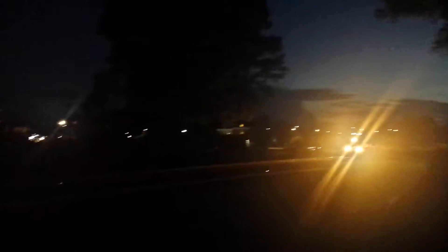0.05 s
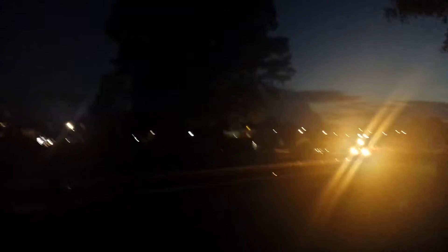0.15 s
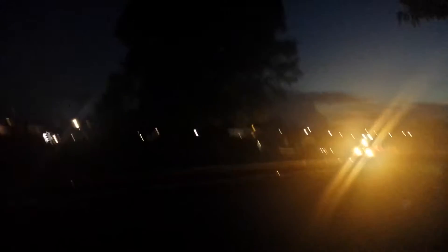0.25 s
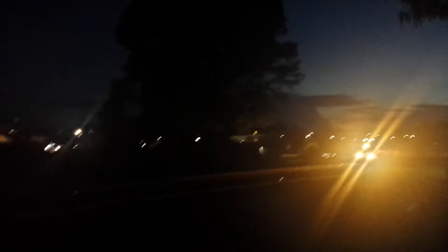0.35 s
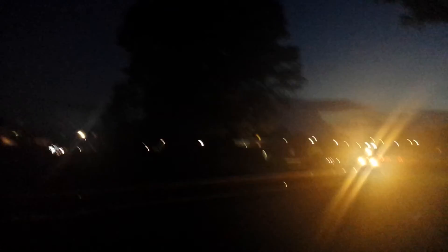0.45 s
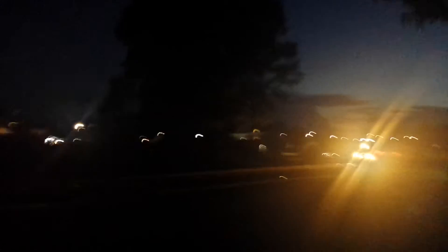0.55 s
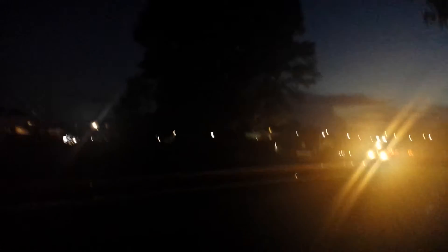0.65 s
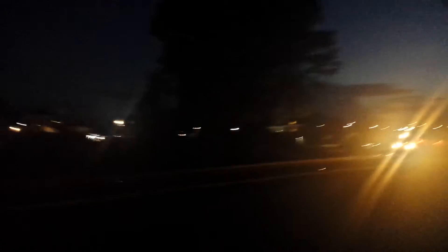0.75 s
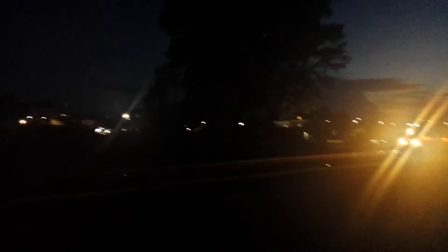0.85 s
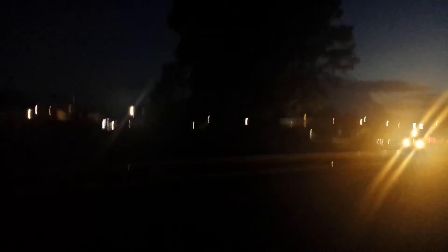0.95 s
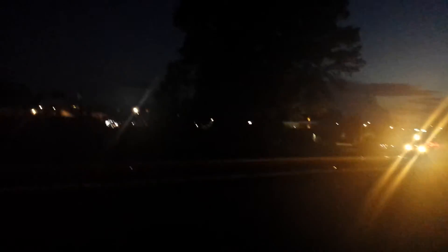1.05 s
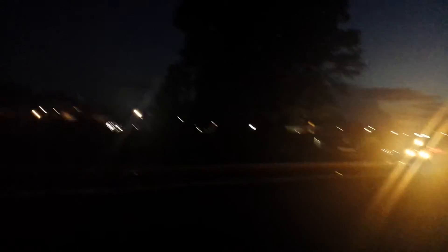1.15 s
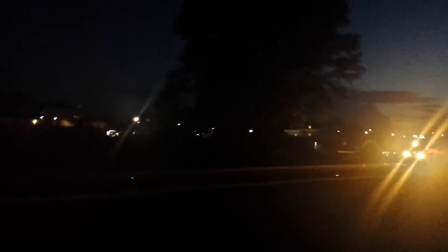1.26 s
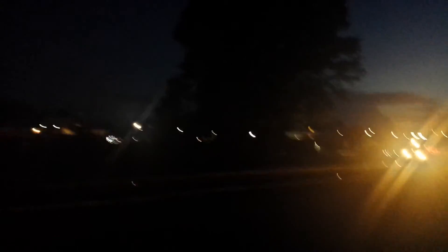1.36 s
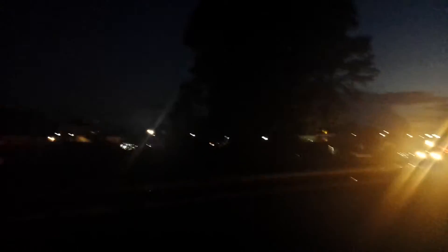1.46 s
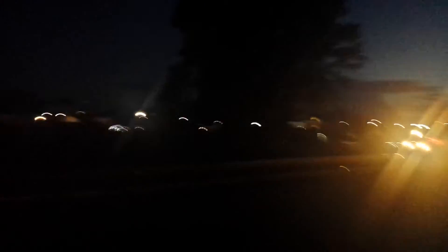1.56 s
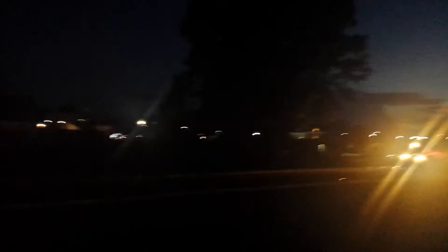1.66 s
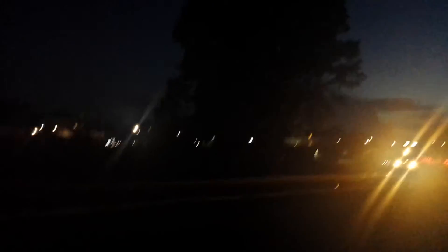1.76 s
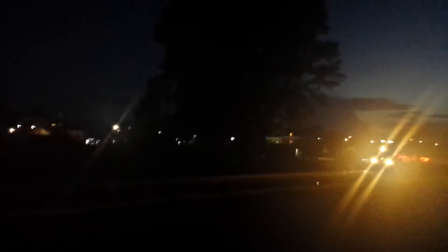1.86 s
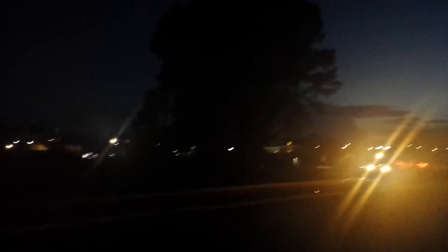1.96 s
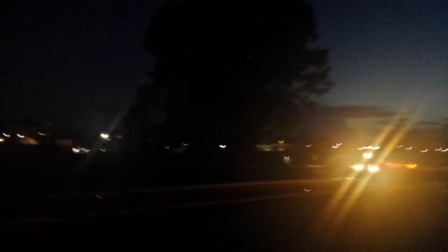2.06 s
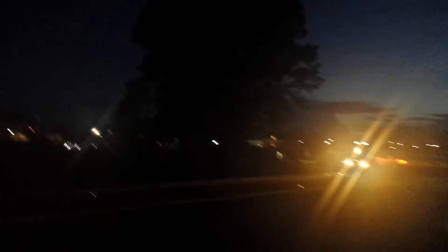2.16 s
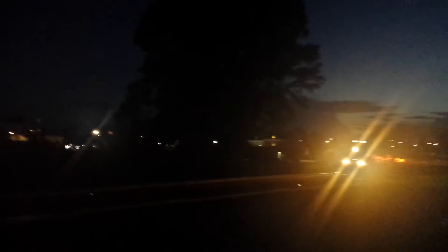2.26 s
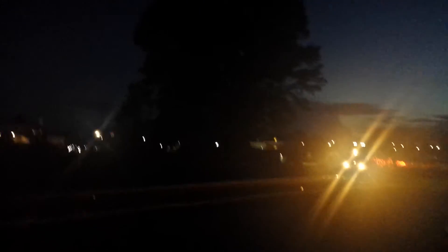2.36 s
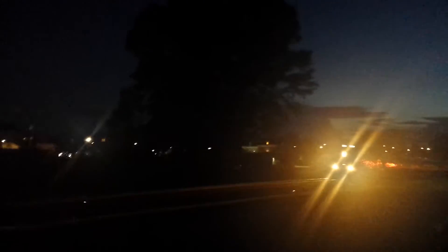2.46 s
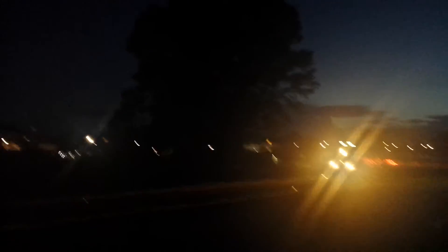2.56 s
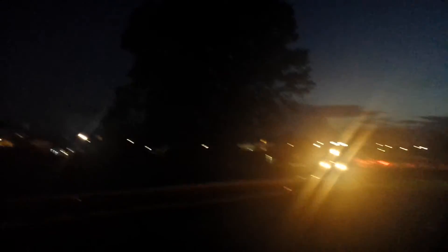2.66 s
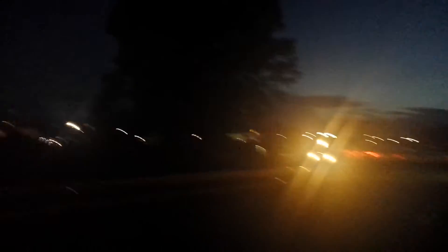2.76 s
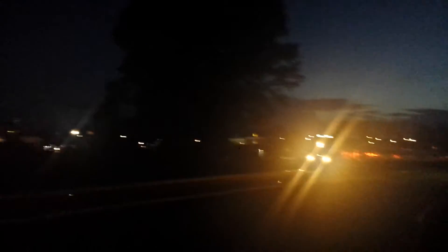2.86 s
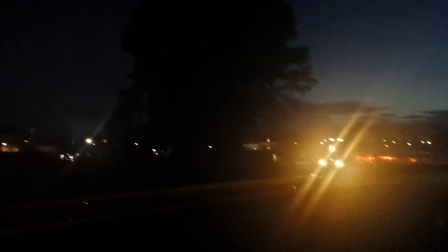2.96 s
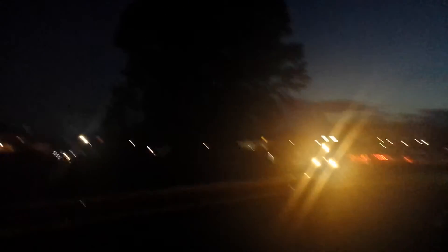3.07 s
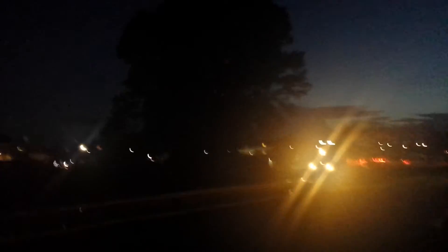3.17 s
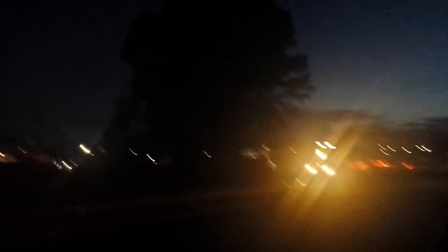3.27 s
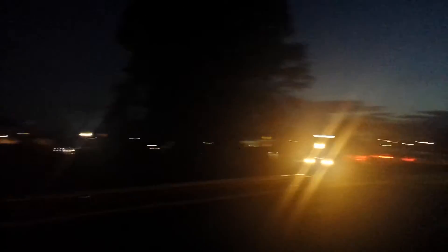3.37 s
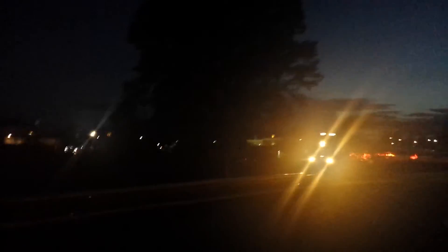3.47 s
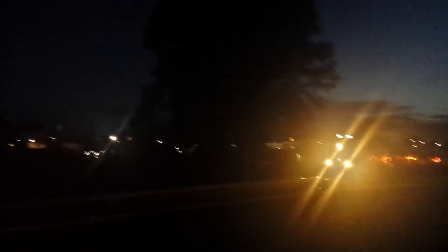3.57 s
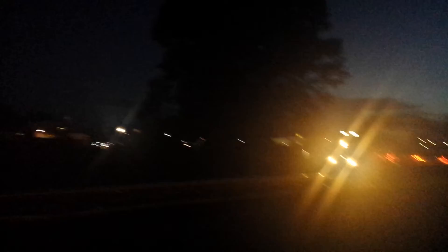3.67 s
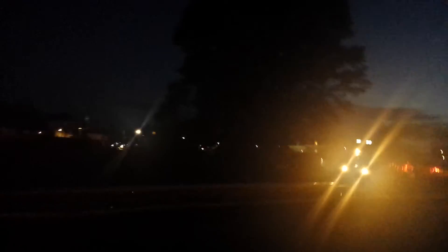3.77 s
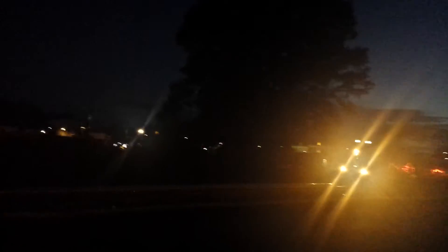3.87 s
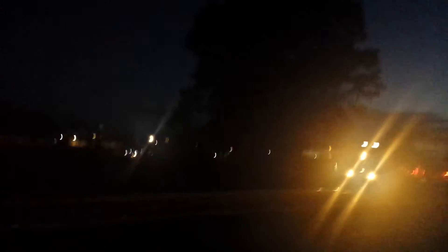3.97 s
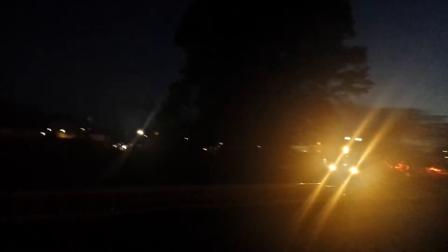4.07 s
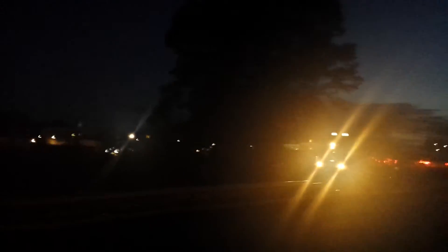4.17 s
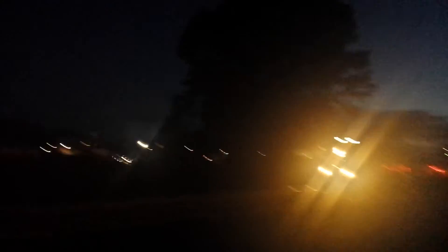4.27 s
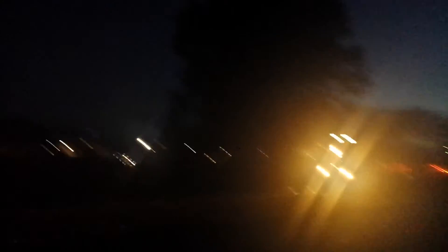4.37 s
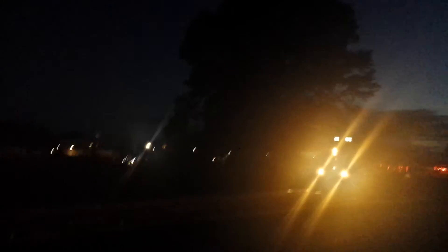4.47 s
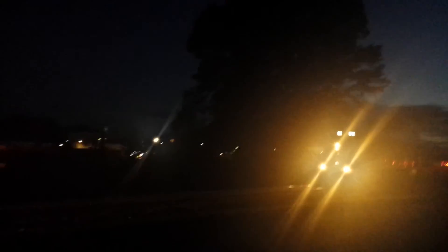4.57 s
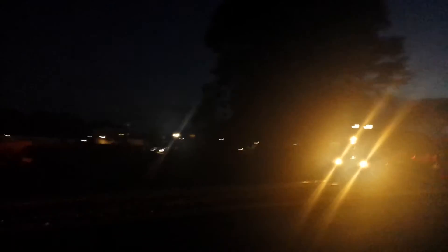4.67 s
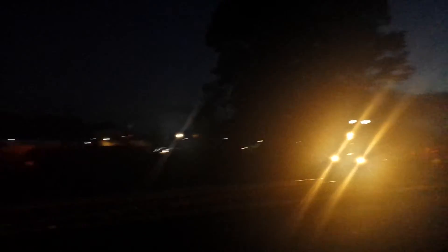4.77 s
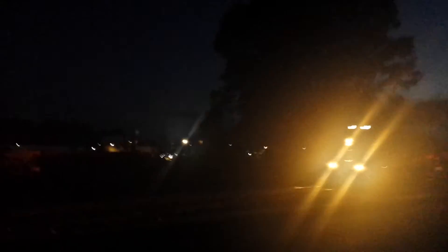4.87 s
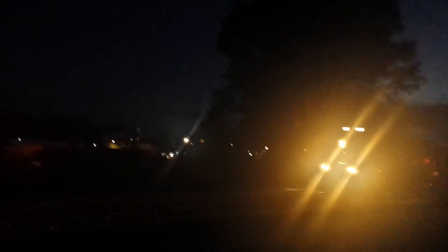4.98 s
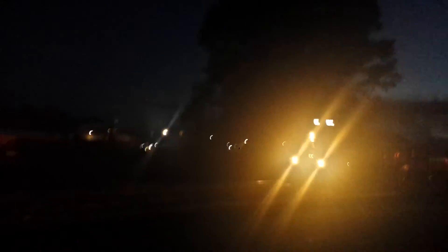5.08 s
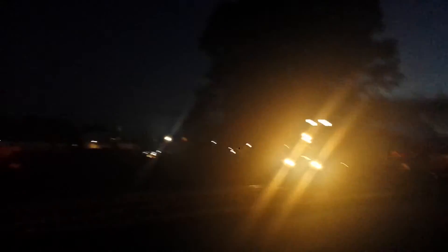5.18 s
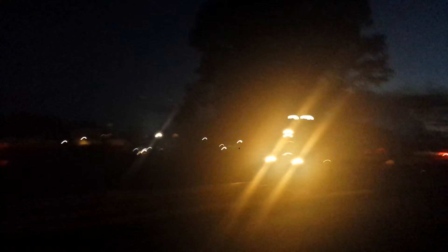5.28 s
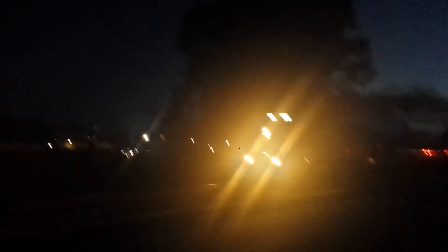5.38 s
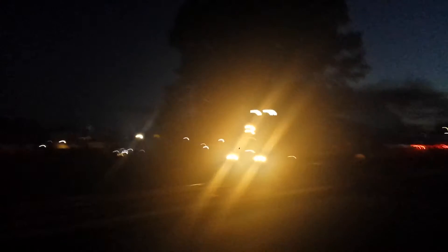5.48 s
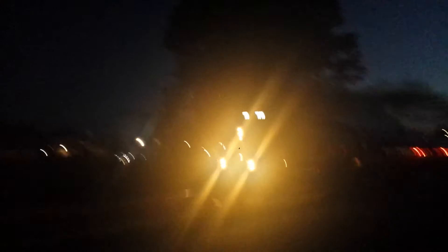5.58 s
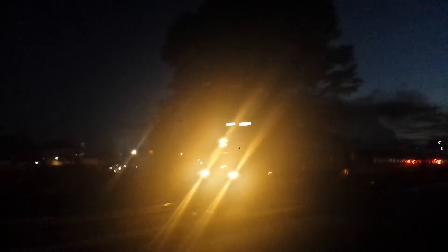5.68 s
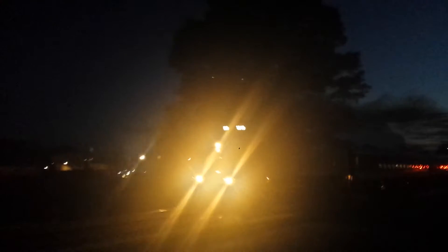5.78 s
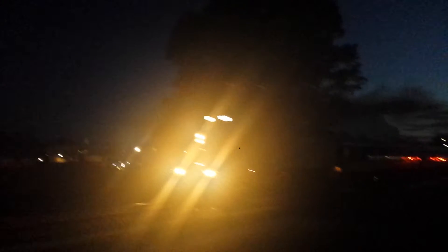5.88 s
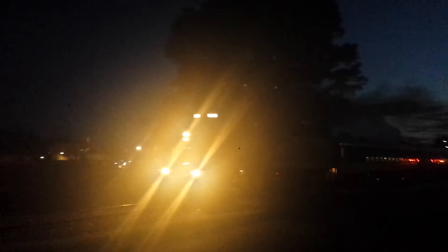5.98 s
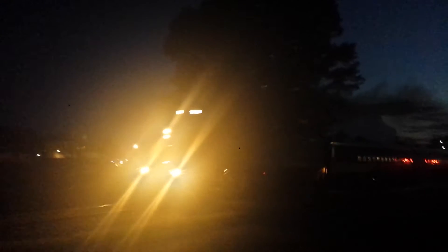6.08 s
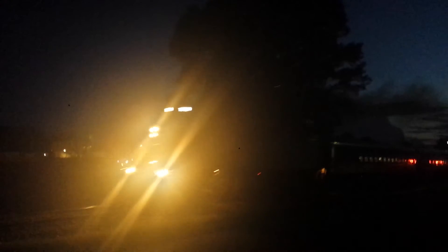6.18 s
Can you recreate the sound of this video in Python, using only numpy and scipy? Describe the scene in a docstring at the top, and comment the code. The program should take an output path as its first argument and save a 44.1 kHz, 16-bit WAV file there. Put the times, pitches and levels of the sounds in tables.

```python
"""A throbbing diesel exhaust fades in: a passenger train approaches, heard in mono from beside the track.
The throb comes once per crank turn as the engine gathers speed, and the machinery whines faintly.
Rough wheels roar and set the rails singing ever louder, with brief flange squeals. One sharp click
ducks the limiter early on; later the running gear knocks twice. As the train draws near, a ground
reflection interferes with the roar."""
import sys
import numpy as np
from scipy import signal
from scipy.fft import irfft, next_fast_len
from scipy.io import wavfile
from scipy.ndimage import uniform_filter1d, minimum_filter1d

SR = 44100
rng = np.random.default_rng(int(sys.argv[2]) if len(sys.argv) > 2 else 0)


def materialize(psi):
    """Save the field psi as 16-bit PCM at rate SR to the path in sys.argv[1].

    A 1-D psi becomes a single channel; in a 2-D psi each row is a channel.
    """
    bounded = np.clip(np.atleast_2d(psi).T, -1, 1)
    quanta = np.round(bounded * 32767).astype(np.int16)
    wavfile.write(sys.argv[1], SR, quanta)


N = 275184
TIME = np.arange(N) / SR

# exhaust harmonics: (order [multiple of crank speed], relative level [dB])
EXHAUST_ORDERS = [(3, -32), (4, -24), (5, -7.5), (6, -7), (7, -13.5), (8, -13), (9, 2), (10, -2),
                  (11, -10.5), (12, -28), (13, -14.5), (14, -21.5), (15, -9.5), (16, -26.5), (17, -53),
                  (18, -28), (19, -29.5), (23, -27.5)]
# exhaust drone and its deep boom: (time [s], drone level [dB], boom level [dB])
EXHAUST_LEVELS = [(0.62, -20.5, -24), (0.92, -18.5, -19), (1.12, -21, -25), (1.5, -19, -25),
                  (1.72, -22, -29), (2.05, -15.5, -24.5), (2.85, -14, -27.5), (3.7, -14.5, -20.5),
                  (4.35, -12.5, -22.5), (5.4, -13.5, -21.5), (5.8, -16, -24.5), (6.15, -19, -27)]
# turbulent exhaust gas: (frequency [Hz], relative spectral level [dB])
RUMBLE_SPECTRUM = [(15, -30), (30, -13), (50, -17), (75, 3), (135, -1), (200, -4), (270, -4), (330, -18.5),
                   (500, -31.5)]
RASP_SPECTRUM = [(150, -4), (260, -1), (350, -0.5), (450, -11.5), (560, -0.5), (690, 4), (800, -3.5),
                 (920, -14), (1050, -6), (1190, -1), (1350, -9.5), (2500, -19)]
# whines of the gear-driven turbocharger and the cooling fan: (time [s], level [dB])
TURBO_LEVELS = [(0.6, -47.5), (1.1, -35.5), (1.5, -42.5), (1.85, -37), (2.3, -50), (2.85, -36.5),
                (4.0, -44), (5.0, -33.5), (6.0, -44)]
FAN_LEVELS = [(0.3, -50), (1.7, -49.5), (2.1, -41), (2.8, -40.5), (3.3, -49.5), (6.24, -56)]
# rail singing under the approaching wheels: (time [s], level [dB])
RAIL_LEVELS = [(0.65, -28.0), (1.3, -25.5), (1.72, -28.5), (2.08, -20), (2.45, -23), (3.55, -17.5),
               (5.3, -16), (5.65, -14.5), (6.15, -14)]
# rolling noise: (frequency [Hz], relative spectral level [dB])
ROAR_SPECTRUM = [(200, -5.5), (500, 1.5), (1000, -0.5), (1400, -2.5), (1800, 0), (2600, -.5), (3000, 0),
                 (3300, 2), (3600, 0.5), (4400, 3.5), (6000, 0), (9000, -17)]
RAIL_SPECTRUM = [(2800, -44), (3600, -13.5), (3850, -8.5), (4300, -6.5), (4750, -3.5), (5100, 1),
                 (5400, -4.5), (5800, 4.5), (6150, -0.5), (6800, -0.5), (7300, -6.5), (7750, -6),
                 (8000, -24), (9500, -43)]
SIZZLE_SPECTRUM = [(6000, -21), (8000, 7.5), (8750, 7), (9200, 0.5), (10500, -3.5), (12200, -2),
                   (13100, -4.5), (14500, 1), (15200, -5), (16000, -15)]
# rail resonances: (frequency [Hz], half-width [Hz], relative level [dB])
RAIL_MODES = [(4400, 83, -24.5), (5175, 27, -20.5), (5610, 25, -13.5), (5800, 19, -29), (5856, 41, -20),
              (6025, 71, -16.5), (6820, 160, -23.5), (7640, 25, -30)]
# wheel flange squeals: (peak time [s], duration [s], frequency [Hz], level [dB])
FLANGE_SQUEALS = [(0.855, 0.27, 2990, -41.5), (1.266, 0.1, 5780, -32), (1.98, .15, 5680, -28.5),
                  (3.2, 0.4, 5750, -28.5), (4.398, .12, 5700, -22), (5.17, 0.16, 5750, -20),
                  (5.52, 0.19, 5620, -21.5), (6.05, 0.99, 4380, -29), (6.13, 0.2, 2700, -34)]
# knocks of the running gear: (time [s], frequency [Hz], level [dB])
KNOCKS = [(4.744, 520, -25), (5.535, 413, -25)]
# ground reflection, growing with nearness: (time [s], delay [ms], nearness [0-1])
GROUND_REFLECTION = [(0, 1.8, 0), (5.2, 2, 0.01), (5.48, 1.53, 0.3), (5.7, 1.42, 0.83), (6.24, 1.34, 0.64)]
# surges of rolling noise: (peak time [s], duration [s], roar change [dB], sizzle change [dB])
ROLLING_SURGES = [(5.32, 0.068, -2, 4.5), (5.39, 0.1, 5, 1), (5.5, 0.038, 3, 6)]

SKIP_S, SKIP_TURNS = 5.29, 0.335   # the throb skips ahead once


def from_db(db):
    """Amplitude ratio of a level in decibels."""
    return 10 ** (np.asarray(db) / 20)


def rms_one(x):
    """Normalisation to unit mean power."""
    return x / np.sqrt(np.mean(x ** 2) + 1e-20)


def in_time(rows):
    """Linear interpolation of each column to one value per sample."""
    times, *columns = np.transpose(rows)
    return [np.interp(TIME, times, column) for column in columns]


def swell(peak_s, length_s):
    """Gaussian envelope with a peak of 1."""
    return np.exp(-2 * ((TIME - peak_s) / length_s) ** 2)


def drift(rate_hz):
    """Random modulation: low-passed noise of unit spread."""
    step, settle = 40, 2000
    pole = np.exp(-2 * np.pi * rate_hz * step / SR)
    white = rng.standard_normal(N // step + settle + 2)
    slow = signal.lfilter([1], [1, -2 * pole, pole * pole], white)[settle:]
    return np.interp(np.arange(N) / step, np.arange(len(slow)), rms_one(slow))


def noise(gain_at):
    """Spectral shaping of white noise by a function of frequency; rms 1."""
    size = next_fast_len(N)
    hz = np.maximum(np.arange(size // 2 + 1) * SR / size, .5)
    white = rng.standard_normal(2 * len(hz)).view(complex)
    return rms_one(irfft(white * gain_at(hz), size)[:N])


def shaped(spectrum, ripple_db=0):
    """Broadband noise that rolls off beyond its spectrum; random ripple stands for modal overlap."""
    points_hz, db = np.transpose(spectrum)
    grid_hz = np.arange(0, SR / 2, 45)
    ripple = ripple_db * rng.standard_normal(len(grid_hz))

    def gain_at(hz):
        level_db = np.interp(np.log(hz), np.log(points_hz), db) + np.interp(hz, grid_hz, ripple)
        return from_db(level_db) * np.minimum(1, points_hz[-1] / hz) ** 2 * np.minimum(1, hz / points_hz[0])
    return noise(gain_at)


def ringing(mode_hz, half_width_hz):
    """Resonance: one mode under random forcing; rms 1."""
    return noise(lambda hz: 1 / (1 + ((hz - mode_hz) / half_width_hz) ** 2))


def tone(hz, wander_hz, flutter_db):
    """A sine under random frequency and amplitude modulation; rms 1."""
    cycles = np.cumsum(hz + wander_hz * drift(15.26)) / SR
    return rms_one(np.sin(2 * np.pi * cycles) * from_db(flutter_db * drift(5.6)))


def crank_speed(start_hz=14.38, climb_hz_per_s=.245, governed_hz=15.17):
    """Uniform acceleration of the crankshaft until the governor holds it."""
    return np.minimum(start_hz + climb_hz_per_s * TIME, governed_hz)


def drone(turns, boom_db, drone_db, waver_db=0.97, overtone_fade_db_per_s=1.5):
    """Dispersion: the exhaust pipe delays each crank order differently, spreading the beat over a turn."""
    boom, body = np.zeros(N), np.zeros(N)
    skipped = np.clip((TIME - SKIP_S) / .03, 0, 1)
    for order, db in EXHAUST_ORDERS:
        deep, overtone = order < 8, order > 13
        smear_turns = 0.019 if deep else .35
        cycles = order * turns - smear_turns * (order - 9.5) ** 2 / 2   # centred on the resonance
        before_skip = np.cos(2 * np.pi * cycles)
        after_skip = np.cos(2 * np.pi * (cycles + order * SKIP_TURNS))
        fade_db = overtone * overtone_fade_db_per_s * (TIME - TIME.mean())
        partial = (1 - skipped) * before_skip + skipped * after_skip
        partial *= from_db(db + waver_db * drift(6.0) - fade_db)
        if deep:
            boom += partial
        else:
            body += partial
    return from_db(boom_db) * rms_one(boom) + from_db(drone_db) * rms_one(body)


def exhaust(speed, beat_db=1.6, firing_db=2.2, uneven_db=2.4):
    """Pulsating flow: a harmonic drone, turbulent rumble and a rasp that puffs with each firing."""
    drone_db, boom_db = in_time(EXHAUST_LEVELS)
    effort_db = drone_db - drone_db.mean()
    turns = np.cumsum(speed) / SR - .415
    beat = np.cos(2 * np.pi * (turns + SKIP_TURNS * (TIME > SKIP_S)))
    firing = np.cos(2 * np.pi * 12 * turns)   # twelve firings a turn
    puffs = from_db(beat_db * beat + firing_db * firing + uneven_db * drift(66))
    rasp = from_db(-33.5 + 0.72 * effort_db) * rms_one(shaped(RASP_SPECTRUM) * puffs)
    rumble = from_db(-29.5 + 0.63 * effort_db) * shaped(RUMBLE_SPECTRUM)
    return (drone(turns, boom_db, drone_db) + rumble) * from_db(0.44) + rasp


def whines(speed, turbo_order=78.9, gear_order=73, fan_hz=1591, blower_hz=701):
    """Rotational tones: turbocharger and gear follow the crank; fan and blower keep their own speed."""
    turbo_db, = in_time(TURBO_LEVELS)
    fan_db, = in_time(FAN_LEVELS)
    turbo = from_db(turbo_db) * tone(turbo_order * speed, wander_hz=5.66, flutter_db=2.1)
    gear_gain = from_db(-39) * swell(peak_s=5.07, length_s=1.3)
    gear = gear_gain * tone(gear_order * speed, wander_hz=5.15, flutter_db=0)
    fan = from_db(fan_db) * tone(fan_hz, wander_hz=2.55, flutter_db=2.5)
    blower = from_db(-49) * tone(blower_hz, wander_hz=4.23, flutter_db=0.5)
    return turbo + gear + fan + blower


def shimmer(spectrum, ripple_db, change_hz=0.6986):
    """Modal overlap in steel: which crowded modes are strong changes as the wheels roll on."""
    weights = (np.cos(np.pi * (change_hz * TIME + k / 3)) ** 2 for k in range(3))
    return rms_one(sum(weight * shaped(spectrum, ripple_db) for weight in weights))


def rails(swell_db=4.0, flutter_db=0.82):
    """Forced vibration: wheel roughness drives a dense hiss of rail modes, and a few ring out."""
    singing = from_db(-1.98) * shimmer(RAIL_SPECTRUM, ripple_db=2.0)
    for mode_hz, half_width_hz, db in RAIL_MODES:
        singing += from_db(db + swell_db * drift(2.3)) * ringing(mode_hz, half_width_hz)
    return singing * from_db(flutter_db * drift(8.4))


def wheels(grit_db=0.52):
    """Rolling contact: one roughness modulates the roar, rail singing, sizzle and squeals alike."""
    rail_db, = in_time(RAIL_LEVELS)
    approach_db = rail_db - rail_db.mean()
    _, nearness = in_time(GROUND_REFLECTION)
    roar_db = -28 + 0.58 * approach_db - 2.5 * nearness
    sizzle_db = -38 + 1.22 * approach_db - 9 * nearness
    for peak_s, length_s, roar_change_db, sizzle_change_db in ROLLING_SURGES:
        roar_db += roar_change_db * swell(peak_s, length_s)
        sizzle_db += sizzle_change_db * swell(peak_s, length_s)
    roar = from_db(roar_db) * over_ground(shimmer(ROAR_SPECTRUM, ripple_db=2.33))
    # the top mode is damped fast along the rail, so it emerges only as the train approaches
    top_db = -26 + 2.2 * (TIME - 4.5).clip(max=0)
    top_mode = from_db(top_db) * ringing(mode_hz=14100, half_width_hz=460)
    # close by, the wheel discs add their own lower ring
    discs = nearness * from_db(-2) * ringing(mode_hz=5200, half_width_hz=580)
    singing = from_db(rail_db) * (rails() + top_mode + discs)
    sizzle = from_db(sizzle_db) * shimmer(SIZZLE_SPECTRUM, ripple_db=3.0)
    return (roar + singing + sizzle + squeals()) * from_db(grit_db * drift(55))


def squeals(relative_width=0.0036):
    """Sharp resonance: wheel flanges sing in narrow bands that swell and die away."""
    return sum(from_db(db) * swell(peak_s, length_s) * ringing(hz, relative_width * hz)
               for peak_s, length_s, hz, db in FLANGE_SQUEALS)


def click(at_s=1.0099, step_db=6.5, low_cut_hz=120):
    """Step response: the microphone's low cut pulls a sudden jump in the signal back to rest."""
    step = from_db(step_db) * (TIME >= at_s)
    return signal.sosfilt(signal.butter(2, low_cut_hz, "high", fs=SR, output="sos"), step)


def knocks(t60_s=0.16, relative_width=.4):
    """Heavy damping: broad resonances of the running gear start at once and decay exponentially."""
    total = np.zeros(N)
    for at_s, hz, db in KNOCKS:
        envelope = (TIME >= at_s) * from_db(db - 60 * np.abs(TIME - at_s) / t60_s)
        total += envelope * ringing(hz, relative_width * hz)
    return total


def over_ground(x, reflectance=0.55):
    """Interference: an inverted, grazing reflection cuts notches that climb as its delay shrinks."""
    delay_ms, nearness = in_time(GROUND_REFLECTION)
    strength = reflectance * nearness
    echo = np.interp(TIME - delay_ms / 1000, TIME, x)
    return (x - strength * echo) / np.sqrt(1 + strength ** 2)


def scene():
    """Superposition of all sources, alike in both channels."""
    speed = crank_speed()
    mono = exhaust(speed) + whines(speed) + wheels() + knocks() + click()
    return np.array([mono, mono])


def limiter(x, ceiling=0.89, hold_s=0.026, ease_s=0.0024):
    """Look-ahead limiting: the gain drops just before each overload and returns just after."""
    allowed = ceiling / np.maximum(np.abs(x), ceiling)
    held = minimum_filter1d(allowed, int(hold_s * SR))
    return x * uniform_filter1d(held, int(ease_s * SR))


def record(dry, start_s=0.3, fade_s=0.31, cutoff_hz=15500):
    """Peak limiting, a fade in from silence and steep low-pass filtering."""
    fade = np.clip((TIME - start_s) / fade_s + 0.029, 0, 1) * (TIME > start_s)
    low_pass = signal.ellip(12, .1, 90, cutoff_hz, fs=SR, output="sos")
    return signal.sosfilt(low_pass, limiter(dry) * fade)


dry = scene()
out = record(dry)
materialize(out)
```